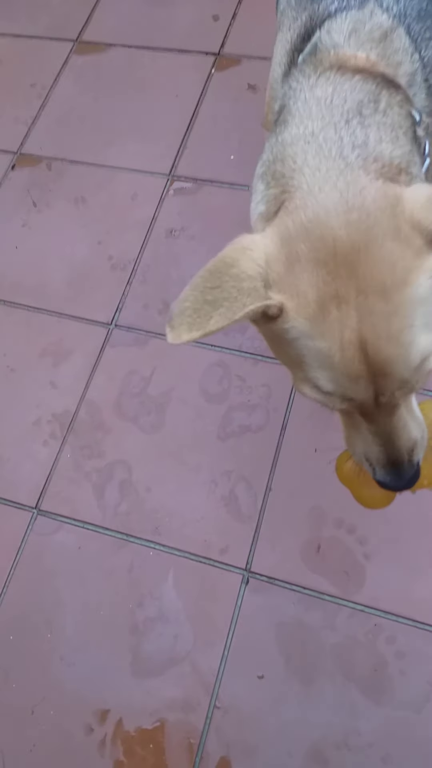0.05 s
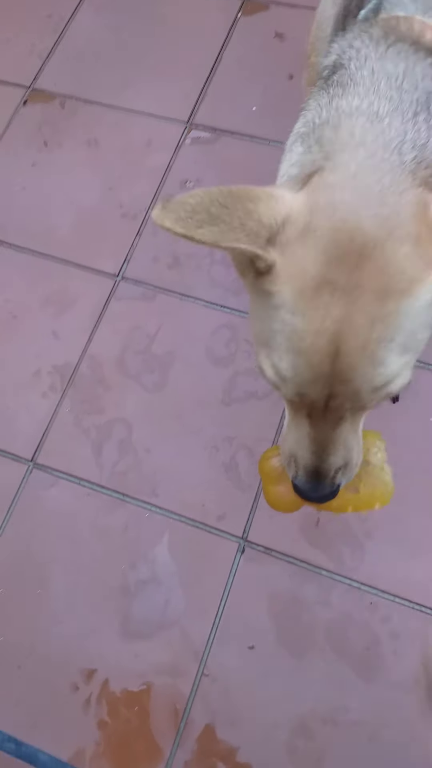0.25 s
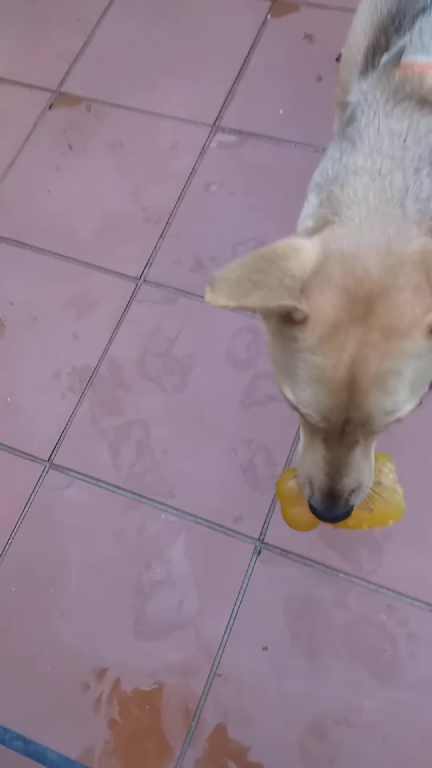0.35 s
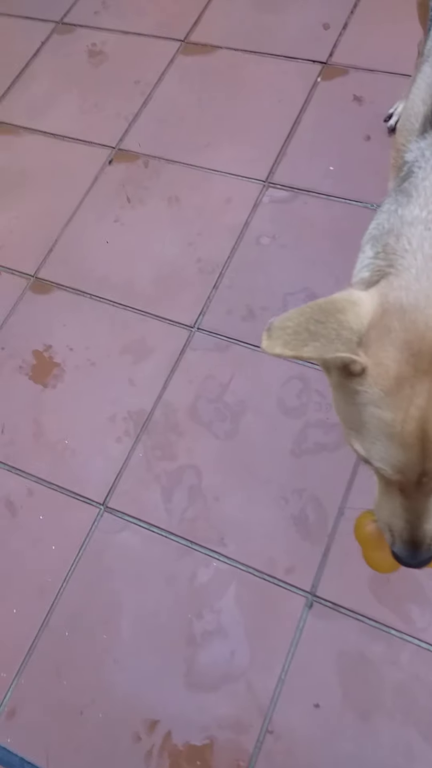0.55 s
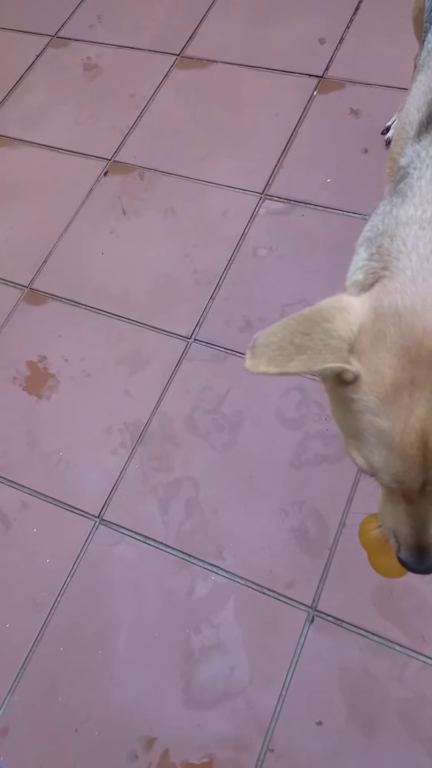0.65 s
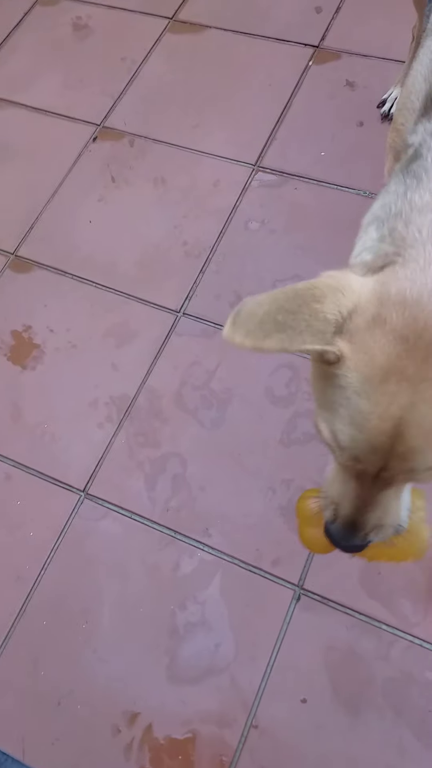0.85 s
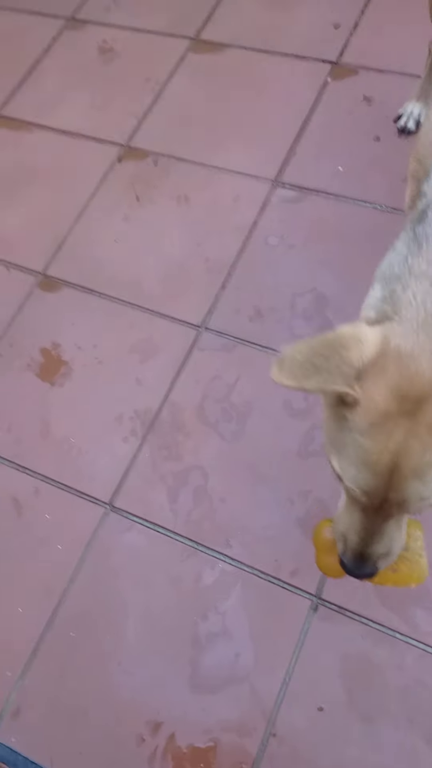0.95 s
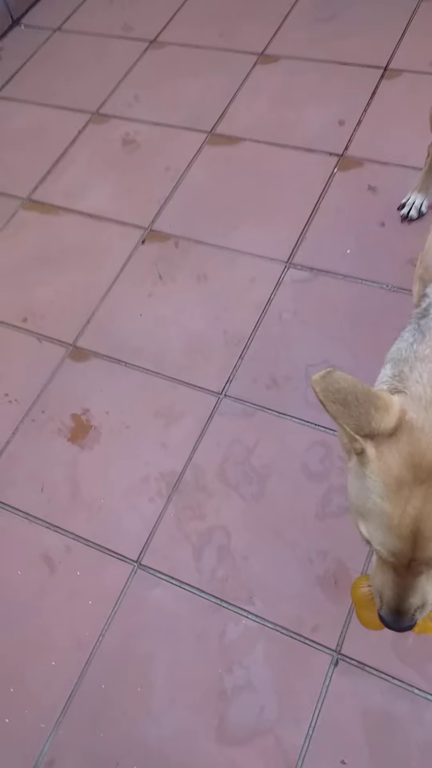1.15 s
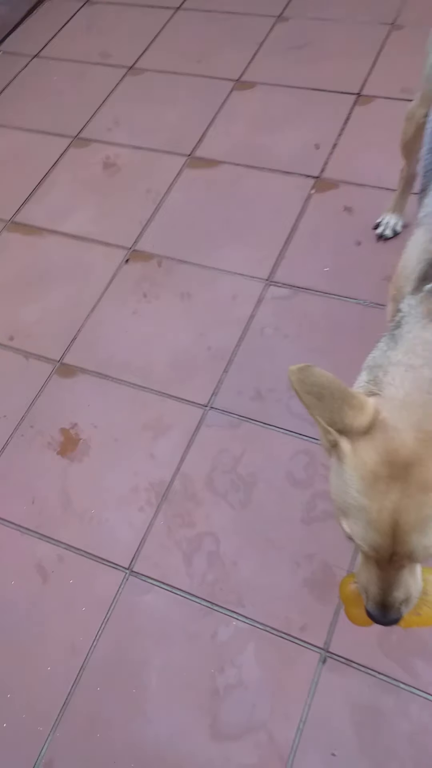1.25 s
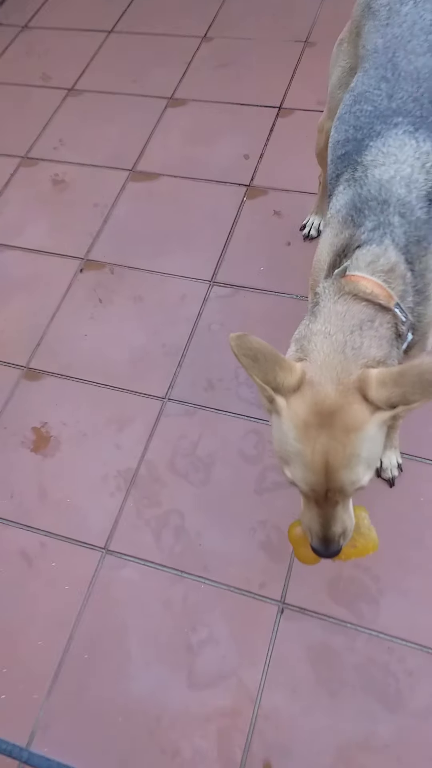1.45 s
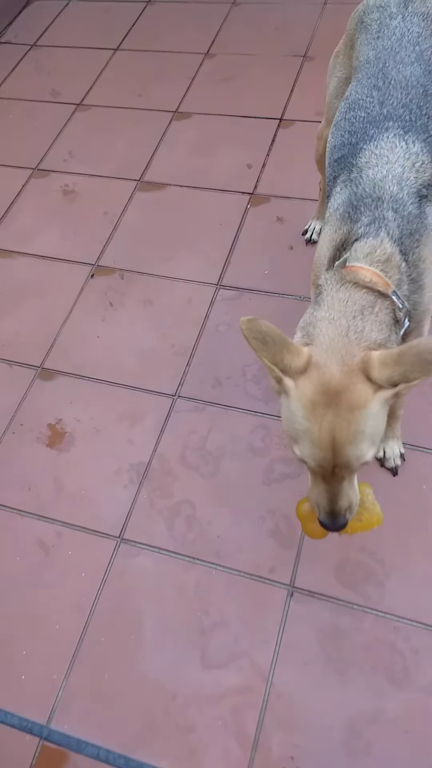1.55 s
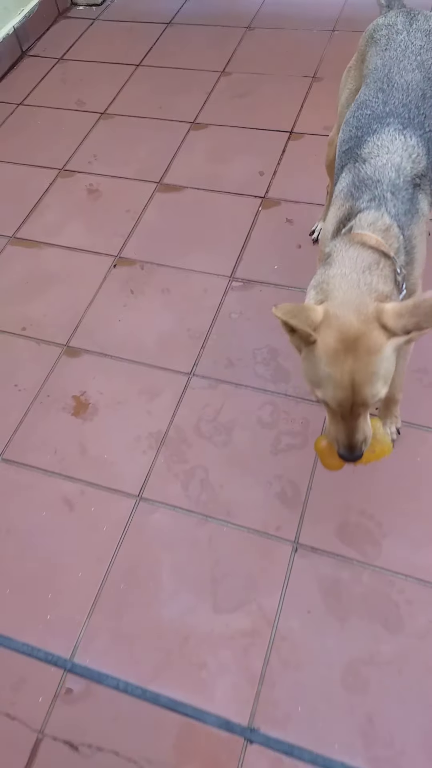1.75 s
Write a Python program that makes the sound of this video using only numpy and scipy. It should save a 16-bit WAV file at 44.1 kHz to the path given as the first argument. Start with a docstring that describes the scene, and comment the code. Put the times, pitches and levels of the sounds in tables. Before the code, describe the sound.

A hollow plastic toy knocks on tiles as a dog mouths it close by. A brief scrape at 0.1 seconds leads into a loud, sharp clatter at 0.25, and a softer clatter follows near 0.9, each ringing briefly off hard walls. Teeth and claws tick lightly around them. A faint bird chirps at 1.1 seconds over quiet hiss and hum, and a soft, low rush rises from about 1.4.

```python
"""Dog knocking a toy on tile

Close to the microphone, in a hard-walled room, a dog mouths a hollow plastic toy, scrapes it over the
tiles and knocks it down twice, each knock a quick clatter. Teeth and claws tick and the walls ring on.
Fainter are a creak, a thin squeak, a distant bird's chirp, a quiet wash, a hum and a late, low rush."""
import sys
import numpy as np
from scipy import signal
from scipy.fft import rfft, irfft
from scipy.io import wavfile

SR = 44100
rng = np.random.default_rng(int(sys.argv[2]) if len(sys.argv) > 2 else 0)


def transcribe(u):
    """Save the signal u as a 16-bit wav file named by the first command-line argument.

    u: samples, shape (n,) or (channels, n), limited to [-1, 1]; the rate is SR.
    q: integer samples, one column per channel.
    """
    v = np.clip(np.atleast_2d(u).T, -1, 1)
    q = np.round(v * 32767).astype(np.int16)
    wavfile.write(sys.argv[1], SR, q)


N = 79380


def undb(db):
    """Decibels to gain."""
    return 10 ** (np.asarray(db) / 20)


def unit(x):
    """Scale to rms 1."""
    return x / np.sqrt(np.mean(x ** 2))


def clock():
    """Time of each sample in seconds."""
    return np.arange(N) / SR


def fade(t60):
    """Exponential decay, 60 dB in t60 seconds."""
    return np.exp(-np.log(1000) * clock() / max(t60, 1e-3))


def add(out, at, x):
    """Mix a sound in from a given time."""
    i = max(int(at * SR), 0)
    out[i:] += x[:N - i]


def colour(x, points):
    """Filter by (f/Hz, level/dB) points."""
    hz, db = np.array(points, float).T
    f = np.maximum(np.fft.rfftfreq(N, 1 / SR), 1)
    gain = undb(np.interp(np.log(f), np.log(hz), db))
    return irfft(rfft(x) * gain, N)


def noise(points):
    """Coloured noise of rms 1."""
    return unit(colour(rng.standard_normal(N), points))


def split(x, hz):
    """The parts below and above a frequency."""
    low = signal.sosfiltfilt(signal.butter(2, hz, fs=SR, output="sos"), x)
    return low, x - low


def waver(hz):
    """Smooth random motion of rms 1, mostly slower than hz."""
    return noise([(hz, 0), (2 * hz, -20), (10 * hz, -100)])


def radiate(x, above_hz):
    """Small surfaces radiate little bass."""
    return signal.sosfilt(signal.butter(3, above_hz, "high", fs=SR, output="sos"), x)


def ring(modes, detune=.006):
    """Decaying modes of the toy, slightly retuned by the grip of the jaws."""
    out = np.zeros(N)
    for hz, db, t60 in modes:
        gripped_hz = hz * (1 + detune * rng.standard_normal())
        out += undb(db) * fade(t60) * np.sin(2 * np.pi * gripped_hz * clock())
    return out


# Spectrum of the distant wash: f/Hz, level/dB
WASH_SPECTRUM = [(15, -23.5), (25, -20), (114, 5), (217, -0.5), (326, -0.5), (373, -8.5), (516, -7),
                 (575, -7), (695, -8.5), (1130, -8), (1940, -16), (2480, -16.5), (5280, -20.5),
                 (7710, -27.5), (9070, -42.5), (11600, -35), (16000, -43.5)]
# Gain of its bands over time: t/s, bass/dB, middle/dB, treble/dB
WASH_GAINS = [(0, -47.5, -41, -45), (.12, -47.5, -42, -45.5), (.32, -44, -39.5, -30),
              (.46, -49.5, -45, -43.5), (.6, -51, -50, -47.5), (.8, -50, -49.5, -49.5),
              (1.05, -51.5, -50, -50.5), (1.38, -52, -49, -49), (1.8, -54, -40, -46)]
def wash():
    """Distant noise flickers and sinks; its middle and treble come back at the end."""
    times, *levels = np.array(WASH_GAINS).T
    bass, rest = split(noise(WASH_SPECTRUM), hz=420)
    middle, treble = split(rest, hz=1800)
    out = np.zeros(N)
    for band, db, flicker_db in zip((bass, middle, treble), levels, (1, .7, .3)):
        out += band * undb(np.interp(clock(), times, db) + flicker_db * waver(hz=29))
    return out


def hum(hz=313.5, rms_db=-59.5, waver_db=1.2):
    """One faint background tone, unsteady in level and phase."""
    level = undb(rms_db + waver_db * waver(hz=15))
    phase = 2 * np.pi * hz * clock() + .35 * waver(hz=2)
    return level * np.sqrt(2) * np.sin(phase)


# Modes of the toy's hollow body: f/Hz, level/dB, t60/s
BODY_MODES = [(420, -17, 0.069), (560, -16, 0.048), (646, -6.5, 0.069), (697, -3, 0.078), (861, -7, 0.083),
              (947.3, -5, .07), (1007, -14, 0.043), (1310, -22, 0.024)]
# Modes of its stiff shell: f/Hz, level/dB, t60/s
SHELL_MODES = [(1678, -21, 0.023), (2243, -31, 0.14), (2410, -22.5, 0.044), (2870, -27.5, 0.17),
               (3105, -11.5, 0.014), (3430, -1, 0.0057), (3730, -3, 0.0077), (3800, -24, 0.037),
               (4470, -23, .025), (4950, -18, 0.031), (5290, -11.5, 0.023), (5940, -15.5, 0.0098)]
# Spectrum of a hard contact: f/Hz, level/dB
CONTACT_SPECTRUM = [(100, -30), (400, -2.5), (1250, 2.5), (1700, -18.5), (2300, 2.5), (3200, 10),
                    (6200, -1), (7800, -5), (9500, -20), (12000, -12.5), (16000, -17)]
# Drags over the tile, close by: start t/s, end t/s, end level/dB, rise/dB
DRAGS = [(0.085, 0.207, -44.5, 11.5), (0.19, 0.266, -42.5, 15.5)]
def scrapes(slips_per_s=1200, body_db=3, shell_db=-4.5, grit_db=-11):
    """Dense little slips excite the toy as it is pushed along."""
    t, push = clock(), np.zeros(N)
    for start, end, db, rise_db in DRAGS:
        remaining = np.clip((end - t) / (end - start), 0, 1)
        push += (t >= start) * (t < end) * undb(db - rise_db * remaining)
    slips = rng.standard_normal(N) * (rng.random(N) < slips_per_s / SR)
    body = unit(signal.fftconvolve(slips, ring(BODY_MODES))[:N])
    shell = unit(signal.fftconvolve(slips, ring(SHELL_MODES))[:N])
    grit = unit(colour(slips, CONTACT_SPECTRUM))
    return push * (undb(body_db) * body + undb(shell_db) * shell + undb(grit_db) * grit)


# Diffuse ring of the room: f/Hz, level/dB, t60/s
ROOM_BANDS = [(101.5, 1.5, 0.3), (710, -1, 0.59), (1700, 8.5, 0.46), (2970, 0.5, 0.43), (3900, -1, 0.47),
              (5500, 4.5, 0.29), (8900, 0, 0.28), (16100, 3, 0.43)]
# Slaps from the nearest walls, after the direct sound: t/s, level/dB
WALL_ECHOES = [(.031, -28), (0.046, -27.5)]
def room(x, tail_db=-11, build_s=.0062, near_db=-12.5):
    """Quick reflections from floor and dog, slaps from the nearest walls, and their diffuse ring."""
    t, tail = clock(), np.zeros(N)
    rest = noise([(hz, db) for hz, db, _ in ROOM_BANDS])
    for (hz, _, t60), (next_hz, _, _) in zip(ROOM_BANDS, ROOM_BANDS[1:]):
        band, rest = split(rest, np.sqrt(hz * next_hz))
        tail += band * fade(t60)
    tail += rest * fade(t60=ROOM_BANDS[-1][2])
    tail *= 1 - np.exp(-t / build_s)
    near = rng.standard_normal(N) * fade(t60=.12) * (t > .007)
    response = undb(tail_db) * tail / np.linalg.norm(tail) + undb(near_db) * near / np.linalg.norm(near)
    out = signal.fftconvolve(x, response)[:N]
    for delay, db in WALL_ECHOES:
        add(out, delay, undb(db) * x)
    return out


def strike(rise_s=.00015):
    """A contact builds up over a fraction of a millisecond."""
    return 1 - np.exp(-clock() / rise_s)


def crack(treble_db, t60):
    """A short burst of contact noise."""
    low, high = split(noise(CONTACT_SPECTRUM), hz=7200)
    return (low + undb(treble_db) * high) * fade(t60) * strike()


# Toy on tile, close by: t/s, thud level/dB, thud f/Hz, shell level/dB, crack level/dB, crack treble/dB
TOY_CONTACTS = [(.1985, -31.5, 523, -47, -33.5, -3), (0.2335, -39, 680, -20, -24, -3),
                (0.2411, -26, 686, -42, -23, 5), (.249, -33, 710, -12, -23, 2),
                (.2539, -17.5, 780, -1, -7, 0), (.2555, -18, 1020, -1.5, -29, -5),
                (.262, -18.5, 965, -24, -30, 7), (.2662, -17.5, 970, -10, -12, -3),
                (.3005, -24, 670, -41, -28, -10), (0.86, -55, 600, -41, -39, 7),
                (0.8647, -31.5, 630, -35, -25.5, -4), (.8721, -24.5, 764, -43, -17, 4),
                (.8789, -21, 587, -24, -21, 1), (.885, -29, 585, -36, -43, 17),
                (.889, -38, 640, -34, -40, -3)]
def knocks(spread_octaves=.42):
    """Each contact thuds in the hollow body, rings the shell and cracks on the tile."""
    out = np.zeros(N)
    for at, thud_db, thud_hz, shell_db, crack_db, treble_db in TOY_CONTACTS:
        # Body modes far from thud_hz are excited less.
        excited = [(hz, db - 5 * (np.log2(hz / thud_hz) / spread_octaves) ** 2, t60)
                   for hz, db, t60 in BODY_MODES]
        thud = undb(thud_db) * ring(excited) * strike()
        shell = undb(shell_db) * radiate(ring(SHELL_MODES) * strike(), above_hz=1500)
        add(out, at, thud + shell + undb(crack_db) * crack(treble_db, t60=.025))
    return out


# Teeth and claws near the microphone: t/s, level/dB, treble/dB
TOOTH_AND_CLAW_TAPS = [(.21, -37, 7), (0.214, -35.5, 5), (0.226, -27, -3), (.408, -34, -24),
                       (.464, -48, -16), (0.827, -43, -3), (0.829, -50, -4), (1.2257, -56, 13.5),
                       (1.334, -65, 14)]
def ticks():
    """Light dry contacts of teeth and claws."""
    out = np.zeros(N)
    for at, db, treble_db in TOOTH_AND_CLAW_TAPS:
        add(out, at, undb(db) * crack(treble_db, t60=.03))
    return out


# Creak, distant bird, thin squeak: t/s, length/s, first f/Hz, middle f/Hz, last f/Hz, level/dB
CHIRP_GLIDES = [(0.44, 0.0083, 2080, 2150, 2300, -36.5), (1.093, 0.0385, 2640, 2480, 2020, -44.5),
                (.808, 0.05, 13900, 14550, 15000, -55.5)]
def chirps(rough_radians=.45):
    """A short creak, a distant bird's chirp and a thin high squeak, each on a curved, unsteady glide."""
    out = np.zeros(N)
    for at, length, first_hz, middle_hz, last_hz, db in CHIRP_GLIDES:
        progress = np.clip(clock() / length, 0, 1)
        glide = np.polyfit([0, .5, 1], [first_hz, middle_hz, last_hz], 2)
        hz = np.polyval(glide, progress)
        phase = 2 * np.pi * np.cumsum(hz) / SR + rough_radians * waver(hz=200)
        add(out, at, undb(db) * np.sin(np.pi * progress) ** 2 * np.sin(phase))
    return out


# Spectrum of the distant rush: f/Hz, level/dB
RUSH_SPECTRUM = [(24, -44), (40, -13), (77, -7.5), (159, 0.5), (312, -1.5), (467, -18.5), (516, -7),
                 (585, -25.5), (1070, -7), (2000, -20.5), (4030, -20), (5870, -22), (9450, -39.5),
                 (12500, -34), (16000, -33)]
# Its swell at the microphone: t/s, level/dB
RUSH_LEVELS = [(1.35, -83), (1.46, -51.5), (1.55, -47.5), (1.69, -45.5), (1.8, -49)]
def rush():
    """A low, rushing noise rises behind the dog."""
    times, db = np.array(RUSH_LEVELS).T
    return noise(RUSH_SPECTRUM) * undb(np.interp(clock(), times, db))


def scene():
    """Dog and toy in front of one microphone, the room around them, the background beyond."""
    dog = radiate(scrapes() + knocks() + ticks(), above_hz=340)
    chirping = chirps()
    reflections = room(dog + undb(5) * chirping)  # the chirps carry more room sound
    return (wash() + hum() + dog + reflections + chirping + rush())[None]


def record(dry, top_hz=15850):
    """The microphone signal clips at full scale and the top is cut."""
    lowpass = signal.ellip(10, .2, 80, top_hz, fs=SR, output="sos")
    return signal.sosfilt(lowpass, np.clip(dry, -1, 1))


dry = scene()
out = record(dry)
transcribe(out)
```